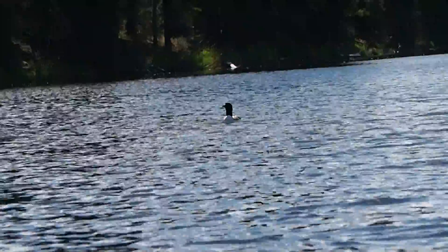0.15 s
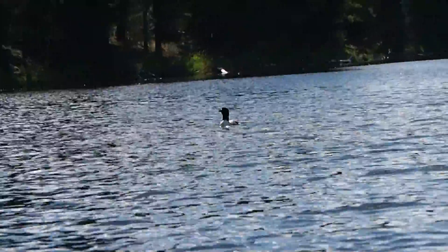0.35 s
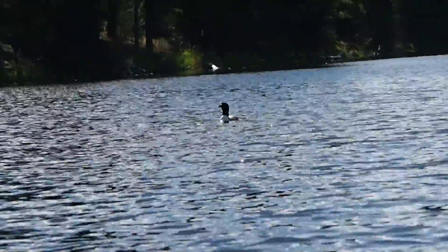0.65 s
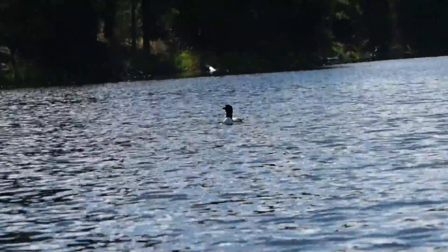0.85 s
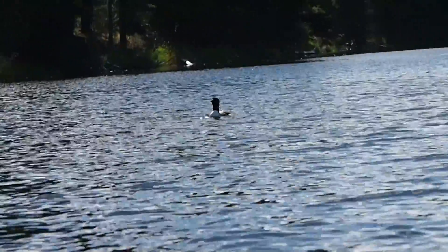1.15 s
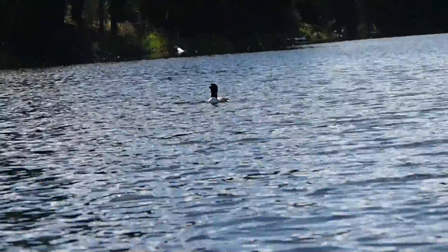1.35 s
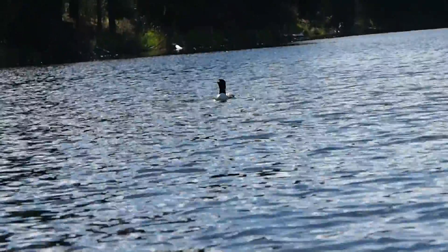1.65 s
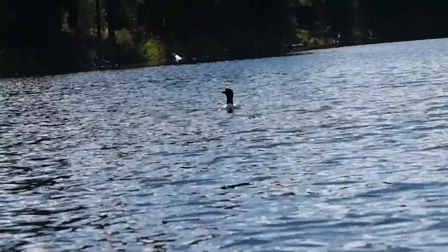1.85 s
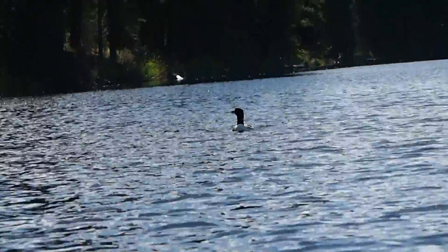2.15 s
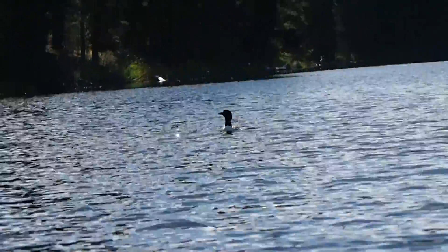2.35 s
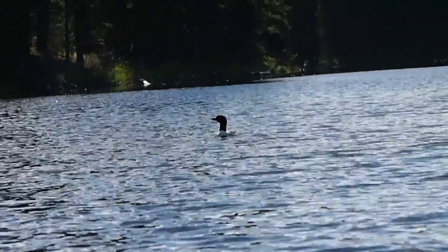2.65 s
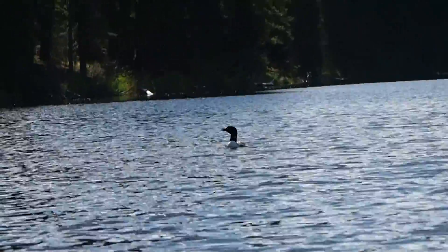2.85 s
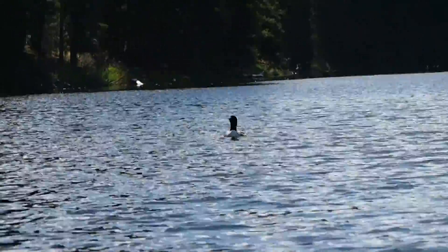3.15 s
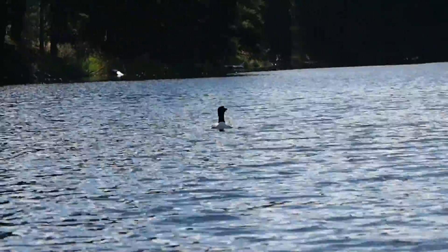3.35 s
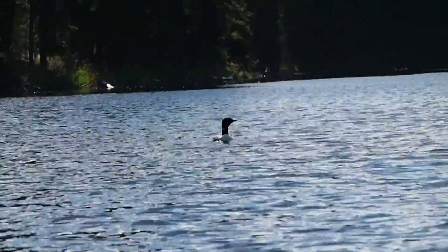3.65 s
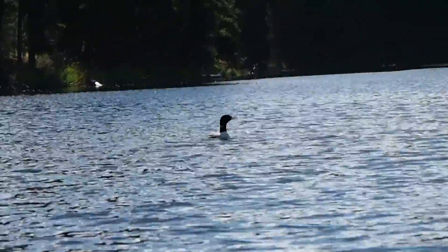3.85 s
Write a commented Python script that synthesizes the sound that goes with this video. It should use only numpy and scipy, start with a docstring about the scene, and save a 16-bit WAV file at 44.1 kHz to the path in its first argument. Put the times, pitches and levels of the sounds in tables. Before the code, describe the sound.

First the blurred echo of an earlier loon call dies away over soft lake wash, then a brief slap and glug of water, then two clear laughing loon calls with long shoreline reverberation, heard from across open water.

```python
"""On a lake a loon gives two tremolo calls, and the wooded shore returns a long echo.
The voice is near-sine partials; its pitch swings about ten times a second and breaks between three
registers, and in places a tone 238 Hz lower beats with it. The echo is sparse decaying noise taps.
A far motor hums as two sines, shaped noise makes air, ripples and wave slaps, and decaying sines glug.
The blurred echo of an earlier call dies away."""
import sys
import numpy as np
from scipy import signal
from scipy.fft import rfft, irfft
from scipy.io import wavfile
from scipy.ndimage import uniform_filter1d

SR = 44100
rng = np.random.default_rng(int(sys.argv[2]) if len(sys.argv) > 2 else 0)


def int16_out(signal):
    """Quantize to a 16-bit WAV file."""
    q = np.round(np.clip(np.atleast_2d(signal).T, -1, 1) * 32767)
    wavfile.write(sys.argv[1], SR, q.astype(np.int16))


N = 176400
TIME = np.arange(N) / SR
FREQS = np.fft.rfftfreq(N, 1 / SR)
BREAK_S = 0.008  # time to change register
BEAT_HZ = 238.3


def amp(db):
    """Decibels to gain."""
    return 10 ** (np.asarray(db) / 20)


def unit(x):
    """Scales to rms 1."""
    return x / np.sqrt(np.mean(x ** 2) + 1e-20)


def at_hz(points, hz):
    """Reads a (Hz, value) curve on a log-frequency axis."""
    f, value = np.transpose(points)
    return np.interp(np.log(hz + 1), np.log(f + 1), value)


def at_time(points):
    """Reads a (s, value) curve at every sample."""
    return np.interp(TIME, *np.transpose(points))


def smooth(x, seconds):
    """Triangular smoothing over about the given time."""
    size = max(int(seconds * SR / 2), 1)
    return uniform_filter1d(uniform_filter1d(x, size), size)


def wander(seconds):
    """Random motion of rms 1: noise with a Gaussian low-pass near 1 / seconds."""
    lowpass = np.exp(-(FREQS * seconds) ** 2)
    return unit(irfft(rfft(rng.standard_normal(N)) * lowpass, N))


def noise_pair(same):
    """Left and right noise spectra with a given correlation."""
    a, b = rfft(rng.standard_normal((2, N)))
    same = np.clip(same, -1, 1)
    return np.array([a, same * a + np.sqrt(1 - same ** 2) * b])


def coloured(spectrum, same):
    """Stereo noise of rms 1 with a given spectrum and left-right correlation."""
    return unit(irfft(noise_pair(same) * amp(at_hz(spectrum, FREQS)), N))


def strike(start, rise, decay):
    """An envelope that swells exponentially to 1 at its start time and dies away."""
    return np.exp(np.minimum((TIME - start) / rise, (start - TIME) / decay))


def motor():
    """Two harmonics of a far motor, each fading in and out on its way over the water."""
    # Second-harmonic pitch. Each row: time in seconds, frequency in Hz.
    second_hz = [(0, 284.5), (2.3, 283.5), (4, 274.5)]
    # Levels of the harmonics ahead of the stereo lean. Each row: time in seconds, rms level in dB.
    first_db = [(0, -48), (.2, -62), (.63, -52), (1.05, -48.5), (1.28, -63.5), (1.45, -50), (2.55, -51),
                (2.69, -57.5), (2.85, -48.5), (3.17, -56.5), (3.33, -46), (3.7, -66.5), (3.92, -53.5)]
    second_db = [(0, -51), (.26, -50.5), (.4, -57), (.75, -49), (1.5, -63), (2.3, -54), (2.57, -60),
                 (3.28, -50), (3.92, -65)]
    phase = np.pi * np.cumsum(at_time(second_hz)) / SR  # first harmonic: half that frequency
    first = amp(at_time(first_db)) * np.sin(phase)
    second = amp(at_time(second_db)) * np.sin(2 * phase)
    lean = amp([[-.5], [.5]])  # left, right
    return np.sqrt(2) * (first + second) * lean


def lake():
    """A soft wash of air and ripples: shaped noise with a slightly wandering level."""
    level_db, swell_db, swell_s = -53, .35, .15
    # Relative wash spectrum. Each row: frequency in Hz, density in dB per Hz.
    wash_spectrum = [(20, -12), (100, -6), (300, -4.5), (850, -7), (1700, -13.5), (6800, -19.5),
                     (8000, -17), (9500, -22), (14000, -27.5)]
    # Left-right correlation. Each row: frequency in Hz, correlation 0-1.
    likeness = [(60, .8), (300, .75), (640, .5), (1400, .25), (3000, 0)]
    wash = coloured(wash_spectrum, at_hz(likeness, FREQS))
    return wash * amp(level_db + swell_db * wander(swell_s))


def old_echo(voice):
    """The last of an earlier, like call, still ringing round the far end of the lake."""
    level_db, t60_s = -11, 8.6
    ago_s = 1  # from the end of the earlier stretch of voice to now
    now = N + round(ago_s * SR)
    echo = np.pad(shore(voice, t60_s), ((0, 0), (0, N)))
    return amp(level_db) * echo[:, now:now + N]


def far_notes():
    """Single sagging notes stand out of the old echo, blurred by the distance."""
    width_s, sag_hz_per_s, blur_s = 0.056, 350, 0.04
    # Notes of the earlier call. Each row: centre in seconds, pitch there in Hz, level in dB.
    notes = [(0.019, 1390, -59), (0.148, 1194, -55), (0.429, 1348, -55.5), (0.561, 1190, -58)]
    out = np.zeros(N)
    for s, hz, db in notes:
        phase = 2 * np.pi * np.cumsum(hz - sag_hz_per_s * (TIME - s)) / SR
        blurred = np.sin(phase + wander(blur_s)) * (1 + .5 * wander(blur_s))
        out += amp(db) * np.exp(-((TIME - s) / width_s) ** 2) * blurred
    return out


def waves():
    """Small waves slap close by as noise bursts, and trapped air glugs as decaying sines."""
    slap_rise_s, glug_rise_s = 0.016, 0.0019
    # Wave slaps. Each row: peak time in seconds, level in dB, decay in seconds.
    slap_rows = [(1.019, -46, 0.029), (1.218, -52, 0.0093), (1.27, -47, 0.031)]
    # Relative slap spectrum. Each row: frequency in Hz, density in dB per Hz.
    slap_spectrum = [(400, -2), (800, 5), (1250, -3), (1550, 3), (2600, -6.5), (15000, -32)]
    # Hollow glugs. Each row: peak time in seconds, pitch in Hz, level in dB, decay in seconds.
    glug_rows = [(1.022, 330.5, -43.5, 0.038), (1.04, 535, -46, 0.035), (1.055, 362, -38, 0.03),
                 (1.071, 398, -45, 0.018), (1.162, 373, -44.5, 0.015)]
    slap_envelope = sum(amp(db) * strike(s, slap_rise_s, decay) for s, db, decay in slap_rows)
    out = coloured(slap_spectrum, same=0.34) * slap_envelope
    for s, hz, db, decay in glug_rows:
        out += amp(db) * strike(s, glug_rise_s, decay) * np.sin(2 * np.pi * hz * (TIME - s))
    return out


def register(stretches, body, tilt_db):
    """A nearly pure tone whose weak overtones glide through the throat's resonances."""
    glide_s = 0.0025  # smoothing of pitch and level
    jitter = .0022  # rms share of the pitch
    voice_db, treble_db, treble_hz = 1, 1.5, 3100
    shimmer_db, shimmer_s, rasp = 4.5, 0.022, 0.21  # act on the treble
    ring_hz, ring_width_hz, top_hz = 5300, 870, 7100
    beat_uneven = 0.31  # random share of the phase swing
    # A lower tone beats with the voice. Each row: start and end in seconds, depth in level 0-1,
    # phase swing in rad.
    beats = [(2.064, 2.108, 0.17, 0.11), (2.152, 2.178, 0.11, 0.35), (2.265, 2.319, 0.47, 0.32),
             (3.566, 3.605, 0.15, 0.5)]
    # Throat and bill resonances in the treble. Each row: frequency in Hz, relative gain in dB.
    throat = [(3100, -6), (3550, 14), (3900, 5), (4350, 10), (4750, 2.5), (5250, 7.5), (5900, -6),
              (6500, -8.5), (7700, -15.5), (8400, -12), (9000, -21), (9600, -11), (11200, -27),
              (15000, -41)]
    # The bill opens differently on each note. Each row: time in seconds, gain in dB of the low
    # overtones, of the ring near 5 kHz, of the top.
    note_colour = [(1.865, 3, 9.5, 21), (1.965, 2.5, 7.5, 7), (2.055, -3.5, 4.5, 4), (2.13, -3, -0.5, -4.5),
                   (2.169, -3.5, 7.5, 6.5), (2.25, -5, 8, 8.5), (2.36, -1, -4, -9), (2.47, 2, 4, 7),
                   (3.295, 2, 14.5, 22), (3.39, 1, 1.5, 4.5), (3.485, -3, -2.5, 6.5), (3.579, 1, -7.5, 1.5),
                   (3.68, -9, 16.5, 12.5), (3.779, -7, 0.5, -9), (3.885, 3.5, 4, 3)]

    s, pitch, level, treble = np.array(sorted(row for curve in stretches for row in curve)).T
    gate = smooth(sum(1. * (TIME > c[0][0]) * (TIME < c[-1][0]) for c in stretches), BREAK_S)
    on = gate > 1e-6
    hz = (smooth(np.interp(TIME, s, pitch), glide_s) * (1 + jitter * wander(0.0037)))[on]

    # level and phase swing together, which favours the lower sideband
    depth = smooth(sum(d * (TIME > a) * (TIME < b) for a, b, d, _ in beats), BREAK_S)[on]
    swing = smooth(sum(w * (TIME > a) * (TIME < b) for a, b, _, w in beats), BREAK_S)[on]
    beat = 2 * np.pi * BEAT_HZ * TIME[on]
    beat_phase = swing * (np.sin(beat) + beat_uneven * wander(0.003)[on])
    phase = 2 * np.pi * np.cumsum(hz) / SR - beat_phase

    k = np.arange(2, 16)[:, None]  # overtone numbers
    overtone_hz = k * hz
    upper = overtone_hz > treble_hz
    note_s, *colour = np.transpose(note_colour)
    body_db, ring_db, top_db = (np.interp(TIME[on], note_s, column) for column in colour)
    bill_db = ring_db * np.exp(-((overtone_hz - ring_hz) / ring_width_hz) ** 2)
    bill_db += top_db * np.clip(1 + (overtone_hz - top_hz) / ring_width_hz, 0, 1)
    slope_db = tilt_db * np.log2(overtone_hz / treble_hz)
    flicker_db = shimmer_db * np.array([wander(shimmer_s)[on] for _ in k])
    bright = upper * amp(at_hz(throat, overtone_hz) + slope_db + bill_db + flicker_db)
    # the treble's summed power follows its own curve
    bright *= amp(treble_db + np.interp(TIME[on], s, treble)) / np.linalg.norm(bright, axis=0)
    bright *= 1 + rasp * np.array([wander(0.003)[on] for _ in k])

    strength = amp(voice_db + smooth(np.interp(TIME, s, level), glide_s)[on])
    lower = strength * amp(at_hz(body, overtone_hz) + body_db)
    heights = uniform_filter1d(np.where(upper, bright, lower), size=32)
    tone = strength * np.sin(phase) + (heights * np.sin(k * phase)).sum(0)
    out = np.zeros(N)
    out[on] = tone * (1 + depth * np.cos(beat))
    return np.sqrt(2) * gate * out


def loon():
    """The voice, breaking from one register to the next, with a husky skirt on every partial."""
    onset_s = 0.019  # each call swells from silence
    husk_db, husk_s = -39.5, 0.0027  # fast unevenness
    # One list per stretch sung in a register. Each row: time in seconds, pitch in Hz, relative level
    # of the fundamental in dB, relative level of the treble in dB.
    low_curves = [
        [(1.839, 692.2, -23.5, -66), (1.865, 706.7, -26.5, -52.5), (1.899, 630.7, -30, -61),
         (1.907, 644.3, -39.5, -81.5), (1.927, 709, -24, -39.5), (1.947, 835.5, -16.5, -56)],
        [(2.318, 647, -36.5, -61), (2.331, 703.6, -25, -39.5), (2.341, 768.3, -21.5, -41.5)],
        [(2.431, 635.8, -32, -65), (2.459, 695, -25, -37), (2.479, 711.3, -25.5, -42), (2.5, 663.5, -31, -55.5),
         (2.524, 587.3, -32.5, -86), (2.552, 597.5, -46, -63)],
        [(3.259, 631, -19.5, -60), (3.269, 704, -23.5, -52), (3.293, 736.6, -21.5, -50.5),
         (3.311, 708, -25.5, -44), (3.334, 649, -32.5, -62.5), (3.35, 699.6, -27, -36), (3.358, 766, -19, -40),
         (3.364, 822, -13.5, -58.5)],
        [(3.85, 625, -31, -62.5), (3.882, 699.3, -29, -37.5), (3.913, 675, -30, -55), (3.938, 604, -38, -79.5)],
    ]
    middle_curves = [
        [(1.95, 1157, -27, -56.5), (1.958, 1111, -6, -38.5), (1.968, 1083, -12, -37), (1.997, 912.5, -16, -57),
         (2.009, 910, -25, -66.5), (2.017, 946, -17, -64.5), (2.031, 1051, -14, -42.5),
         (2.043, 1141, -13.5, -47), (2.066, 1178, -15.5, -41), (2.078, 1139, -22, -55.5)],
        [(2.113, 975.4, -21, -73), (2.121, 972, -15.5, -48), (2.127, 1034, -10.5, -39), (2.141, 1160, -16, -49),
         (2.153, 1238, -22.5, -37)],
        [(2.214, 951.5, -25, -67.5), (2.221, 970, -15, -50.5), (2.231, 1048, -17.5, -42),
         (2.243, 1139, -14.5, -45), (2.256, 1194, -16, -43), (2.27, 1230, -29, -52.5)],
        [(2.344, 1099, -16.5, -60), (2.352, 1083, -13, -38.5), (2.368, 1101, -17, -42), (2.384, 1018, -12, -41),
         (2.402, 913, -17.5, -62), (2.43, 875.4, -28.5, -88)],
        [(3.367, 1175, -14, -44.5), (3.393, 1168, -11.5, -41.5), (3.405, 1086, -14, -45),
         (3.422, 931.6, -14.5, -52.5), (3.437, 908.3, -21, -72), (3.451, 1035, -14, -45),
         (3.466, 1185, -14.5, -45.5), (3.48, 1212, -16, -36), (3.498, 1184, -15, -43.5),
         (3.512, 1062, -19, -58.5), (3.528, 906.6, -16.5, -55), (3.546, 1019, -14, -48),
         (3.556, 1146, -18, -53.5)],
        [(3.738, 953, -24.5, -77.5), (3.75, 997, -15.5, -43), (3.768, 1135, -16.5, -44.5),
         (3.787, 1143, -16.5, -40.5), (3.801, 1077, -15.5, -46), (3.819, 926, -17.5, -54),
         (3.848, 895, -29, -85.5)],
    ]
    high_curves = [
        [(2.08, 1277, -18, -55), (2.084, 1227, -21.5, -58.5), (2.09, 1198, -29, -39.5),
         (2.108, 1138, -26.5, -55)],
        [(2.156, 1397, -9.5, -44.5), (2.174, 1328, -16.5, -39.5), (2.194, 1193, -31, -44),
         (2.208, 1108, -28.5, -56)],
        [(2.273, 1322, -18, -51.5), (2.279, 1311, -18.5, -44), (2.292, 1170, -30.5, -44.5),
         (2.306, 1134, -32.5, -50)],
        [(3.56, 1330, -13, -52.5), (3.57, 1421, -10.5, -37.5), (3.58, 1427, -14, -41.5),
         (3.602, 1404, -16.5, -46.5), (3.618, 1210, -33, -44), (3.63, 1175, -36, -60.5),
         (3.642, 1195, -31, -46), (3.66, 1340, -14.5, -44), (3.678, 1415, -11.5, -44),
         (3.696, 1350, -15, -46.5), (3.718, 1196, -35, -47), (3.732, 1093, -32.5, -59)],
    ]
    # Lower overtones against the fundamental, ahead of note colour. Each row: frequency in Hz, gain in dB.
    low_body = [(1150, -18), (1300, -12), (1420, -6), (1650, -8.5), (1850, -43), (2130, -17), (2400, -33.5),
                (2750, -40.5)]
    middle_body = [(1750, -40.5), (1950, -29.5), (2150, -20), (2330, -19.5), (2500, -11), (2750, -49),
                   (3100, -42.5)]
    high_body = [(2250, -27), (2550, -24.5), (2800, -32.5), (3100, 5.5)]
    low = register(low_curves, low_body, tilt_db=-21.5)  # tilt: treble slope per octave
    middle = register(middle_curves, middle_body, tilt_db=-0.5)
    high = register(high_curves, high_body, tilt_db=2.5)
    fade = 0
    for curve in (low_curves[0], low_curves[3]):  # first stretch of each call
        start = curve[0][0]
        ramp = np.clip(1 - (TIME - start + BREAK_S / 2) / onset_s, 0, 1)
        fade = fade + (TIME > start - BREAK_S) * ramp
    voice = low * (1 - fade) + middle + high
    return voice * (1 + amp(husk_db) * wander(husk_s))


def cracks():
    """Gritty noise puffs, chopped at the beat rate, where the voice starts or changes register."""
    rise_s, decay_s = 0.0028, 0.012
    # Puffs. Each row: peak time in seconds, level in dB.
    puffs = [(1.841, -38), (1.951, -30.5), (2.082, -42.5), (2.163, -50.5), (2.277, -53), (3.258, -45.5),
             (3.37, -36.5)]
    # Relative puff spectrum. Each row: frequency in Hz, density in dB per Hz.
    puff_spectrum = [(300, -25), (600, -9.5), (1200, 14.5), (2200, -14.5), (5100, -10.5), (7000, -28.5),
                     (14000, -31)]
    grit = irfft(rfft(rng.standard_normal(N)) * amp(at_hz(puff_spectrum, FREQS)), N)
    chopped = grit * (1 + np.cos(2 * np.pi * BEAT_HZ * TIME))
    return unit(chopped) * sum(amp(db) * strike(s, rise_s, decay_s) for s, db in puffs)


def ripples(voice):
    """The rippled surface before the bird throws a brief antiphase scatter that widens the voice."""
    level_db, decay_s = -18, 0.0085
    spray = rfft(rng.standard_normal(N) * np.exp(-TIME / decay_s))
    size = abs(spray)
    # even out the spectrum, except in its deep notches
    even = spray / unit(size).clip(.5) / np.sqrt(np.mean(size ** 2))
    side = irfft(rfft(voice) * even, N)
    return amp(level_db) * np.array([side, -side])


def shore(voice, t60):
    """Trees and rocks scatter the call back as a late, dull, long tail; steep banks return whole notes."""
    delay_s, build_s, correlation = 0.047, 0.75, 0.76
    echoes_per_s, spread_db, scatter_db, bank_smear_s = 900, 5, -3.5, 0.019
    # Echo colour. Each row: frequency in Hz, gain in dB.
    echo_colour = [(500, -33), (700, -20), (900, -22.5), (1150, -16), (1400, -22), (1700, -30.5),
                   (2400, -27.5), (4000, -25), (9000, -44)]
    # Steep banks that answer distinctly. Each row: delay in seconds, relative level in dB.
    bank_rows = [(.23, -22.5), (0.359, -9), (.5, -15.5)]
    build = np.clip((TIME - delay_s) / build_s, 0, 1)
    shape = build * np.exp(-np.log(1000) * TIME / t60)
    hits = rng.random(N) < echoes_per_s / SR
    sizes = hits * amp(spread_db * np.clip(rng.standard_normal(N), -2, 2))
    taps = irfft(noise_pair(correlation), N) * sizes
    banks = sum(amp(db) * unit(taps * np.exp(-abs(TIME - s) / bank_smear_s)) for s, db in bank_rows)
    tail = (amp(scatter_db) * unit(taps * shape) + banks) / np.sqrt(N)
    tail = irfft(rfft(tail) * amp(at_hz(echo_colour, FREQS)), N)
    return signal.fftconvolve(voice[None], tail, axes=1)


def scene():
    """The bird nearly straight ahead, with the lake around it."""
    # Voice balance at the microphone. Each row: frequency in Hz, left minus right in dB.
    balance = [(1000, -.1), (2380, -1.5), (4400, -1.5), (8120, 5), (15000, .5)]
    voice = loon() + cracks()
    lean_db = at_hz(balance, FREQS) / 2
    direct = irfft(rfft(voice) * amp([lean_db, -lean_db]), N)
    call = direct + ripples(voice) + shore(voice, t60=1.82)[:, :N]
    return call + old_echo(voice) + far_notes() + motor() + lake() + waves()


def record(dry):
    """A fast limiter flattens the loudest swings; then a low-pass limits the band."""
    ceiling_db, edge_hz = -12.5, 15650
    level = np.sqrt(abs(smooth((dry ** 2).mean(0), 0.0036)))
    limited = dry / np.maximum(level / amp(ceiling_db), 1)
    lowpass = signal.firwin(511, edge_hz, window=("kaiser", 9), fs=SR)
    return signal.oaconvolve(limited, lowpass[None], "same")


dry = scene()
out = record(dry)
int16_out(out)
```